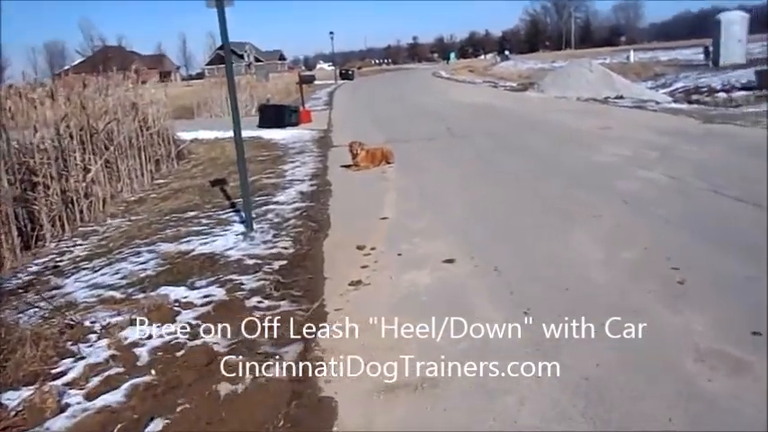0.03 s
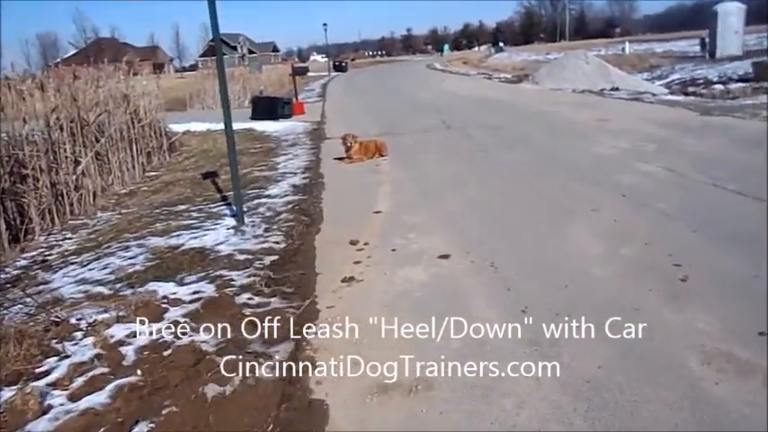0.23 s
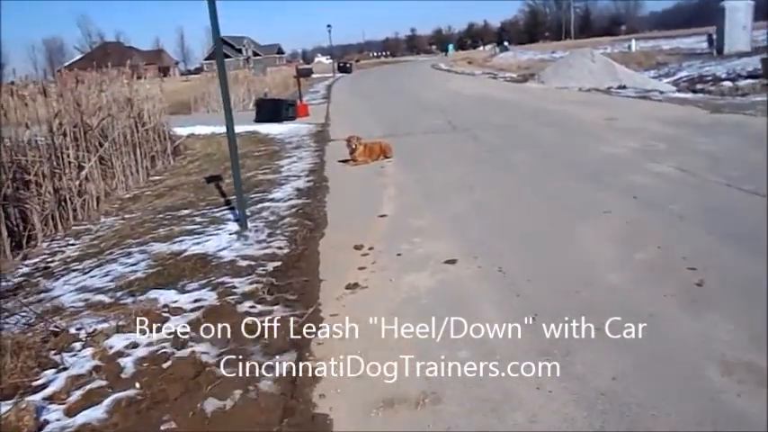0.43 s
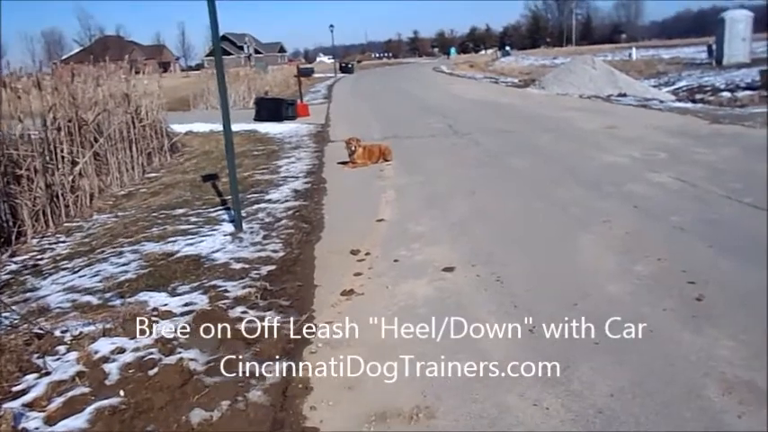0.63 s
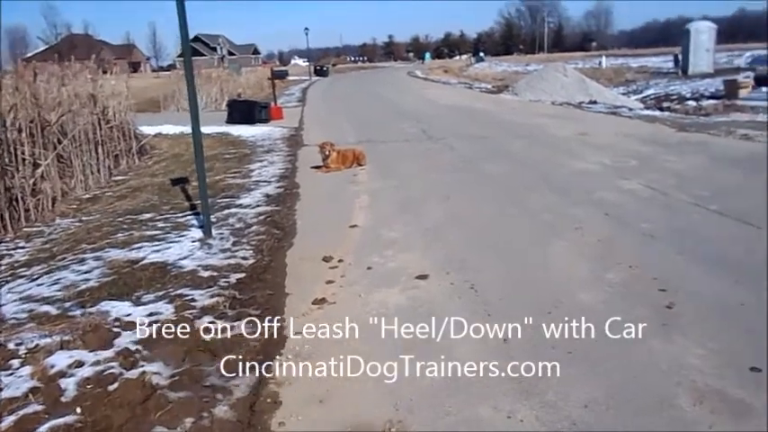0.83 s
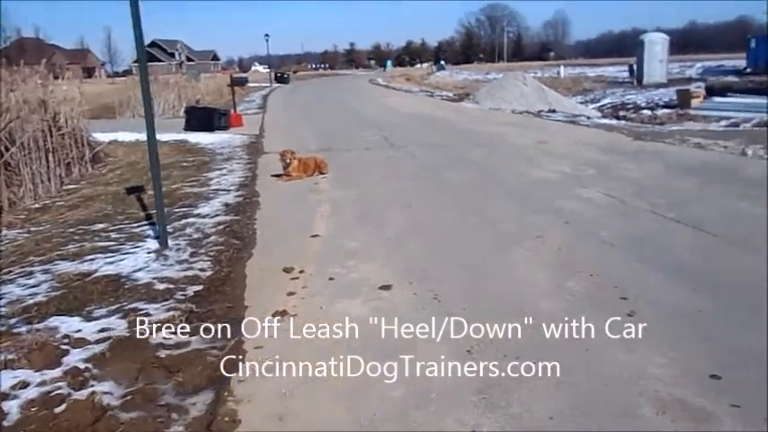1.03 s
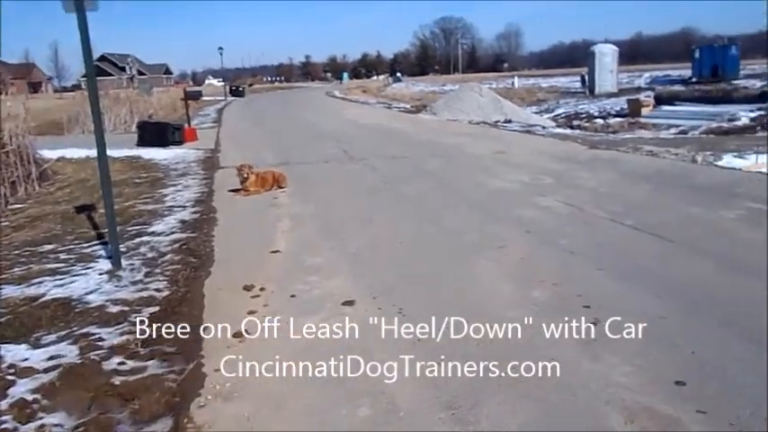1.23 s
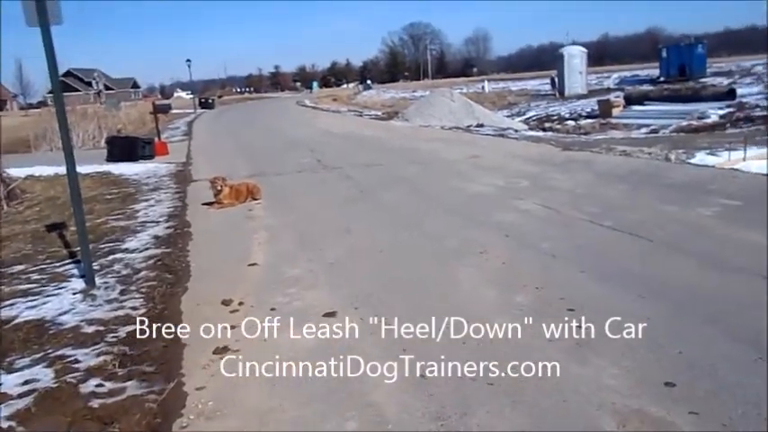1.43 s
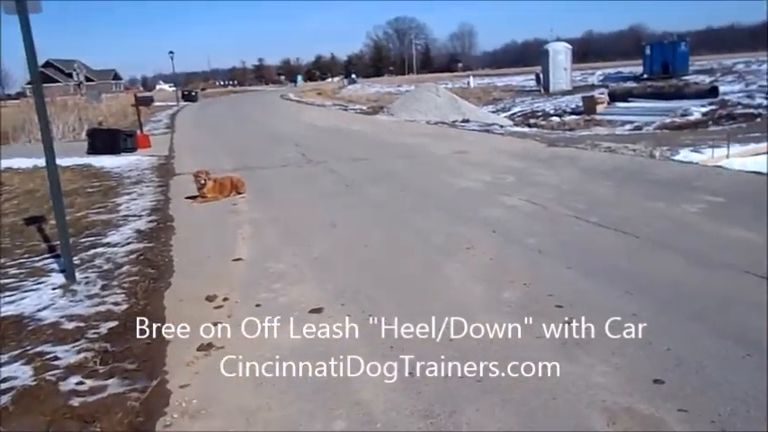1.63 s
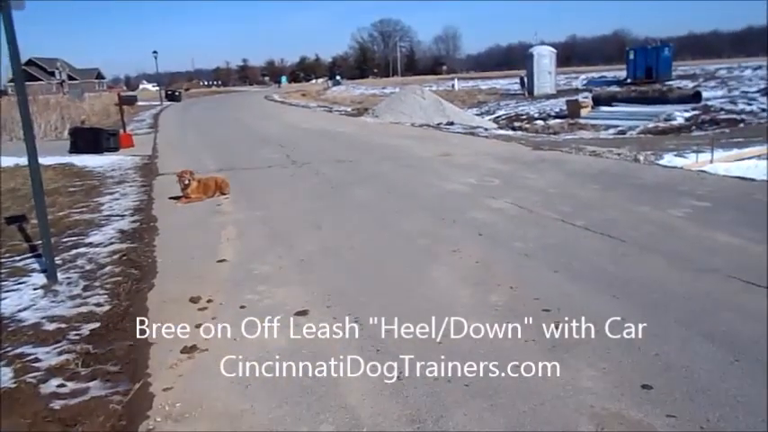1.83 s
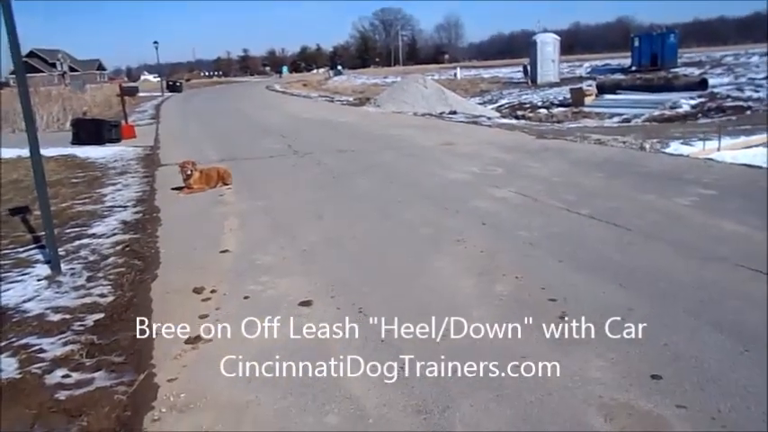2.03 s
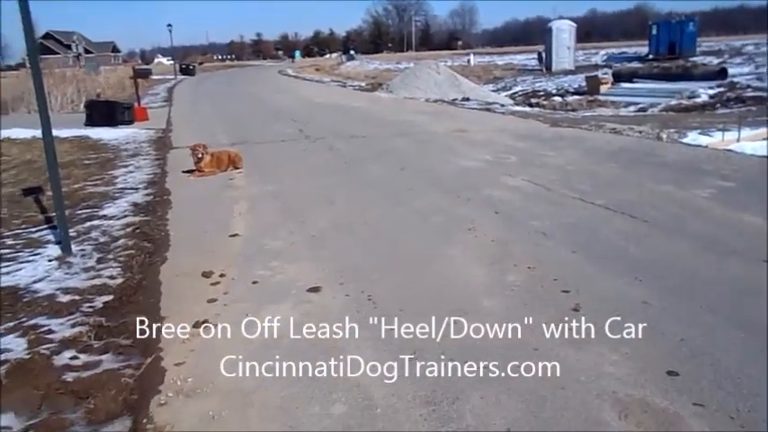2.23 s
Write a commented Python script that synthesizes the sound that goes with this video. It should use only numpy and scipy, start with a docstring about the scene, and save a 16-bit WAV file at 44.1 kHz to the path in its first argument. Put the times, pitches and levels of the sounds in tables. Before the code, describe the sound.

Slow footsteps crunch on gritty asphalt over a low distant engine hum and outdoor air.

```python
"""Slow footsteps on gritty asphalt beside an open country road.
All through, two distant engines idle with a low beating hum, amid thin whines and a wash of outdoor air.
First soles knock softly, loose stones snap in damped rings, and fine grit crunches as many tiny cracks.
A far bird then whistles once, a gliding tone that arches upward.
Quieter steps follow, with more knocks and snaps, dull scuffs of filtered noise, and fine crunching."""
import sys
import numpy as np
from scipy import signal
from scipy.fft import rfft, irfft
from scipy.io import wavfile
from scipy.ndimage import uniform_filter1d

SR = 44100
rng = np.random.default_rng(int(sys.argv[2]) if len(sys.argv) > 2 else 0)


def put_to_file(sound):
    """Save the sound as 16-bit audio at rate SR, in the file named by the first command-line argument."""
    columns = np.atleast_2d(sound).T  # one column per channel
    safe = np.clip(columns, -1, 1)
    whole_steps = np.round(safe * 32767)
    wavfile.write(sys.argv[1], SR, whole_steps.astype(np.int16))


N = 99225  # samples: 2.25 s


def amp(db):
    """Turns decibels into a gain."""
    return 10 ** (np.asarray(db) / 20)


def evened(x):
    """Scales a sound to an average (rms) level of 1."""
    return x / np.sqrt(np.mean(x ** 2) + 1e-20)


def read(points, hz):
    """Reads between the points of a (pitch_hz, value) table, on a log pitch axis."""
    point_hz, value = np.transpose(points)
    return np.interp(np.log(hz + 1), np.log(point_hz + 1), value)


def add(mix, start_s, sound):
    """Mixes a sound in from its start time, cutting it at the end of the mix."""
    first = max(round(start_s * SR), 0)
    part = mix[first:][:len(sound)]
    part += sound[:len(part)]


def coloured(x, points, size=2048):
    """Filters with a (pitch_hz, level_db) response that never sounds ahead of its input."""
    hz = abs(np.fft.fftfreq(size, 1 / SR))
    log_gain = np.log(amp(read(points, hz)))
    # the Hilbert transform finds the phase that keeps the filter causal
    taps = np.fft.ifft(np.exp(np.conj(signal.hilbert(log_gain)))).real
    return signal.fftconvolve(x, taps[:size // 2])[:N]


def drift(rate_hz):
    """Smooth random wandering of rms 1, mostly slower than the given rate."""
    hz = np.fft.rfftfreq(2 * N, 1 / SR)
    spectrum = rfft(rng.standard_normal(2 * N))
    return evened(irfft(spectrum * np.exp(-(hz / rate_hz) ** 2))[:N])


def ping(hz, cycles, size=512):
    """A heavily damped ring whose envelope swells to 1, then dies within a few cycles."""
    turns = hz * np.arange(size) / SR
    u = turns / cycles
    envelope = (u / 2) ** 2 * np.exp(2 - u)
    return envelope * np.sin(2 * np.pi * (turns - 2 * cycles) - np.pi / 2)


def pressure(peak_s, rise_s, fall_s):
    """Weight builds up to a peak time and is then released."""
    t = np.arange(N) / SR - peak_s
    roundness = 1.06  # 1 gives a sharp peak, 2 a bell
    return np.exp(-np.maximum(-t / rise_s, t / fall_s) ** roundness)


def hits(rows):
    """One short ring for each hard little contact."""
    out = np.zeros(N)
    for start_s, level_db, pitch_hz, decay_cycles in rows:
        add(out, start_s, amp(level_db) * ping(pitch_hz, decay_cycles))
    return out


# Stones snapping under a sole; decay is counted in cycles of the pitch, levels are relative.
# Columns: start_s, level_db, pitch_hz, decay_cycles
STONE_SNAPS = [(.2760, -28.5, 3270, 1), (.2798, -30, 4200, 0.28), (.3325, -29.5, 3340, 0.68),
               (.3332, -30.5, 5450, .3), (.3432, -42, 4400, 0.27), (.3830, -25.5, 4170, 0.67),
               (.3894, -4, 3040, 0.38), (.3949, -20, 3600, 0.54), (.3996, -17.5, 4020, 0.64),
               (.4061, -56, 2950, 0.35), (.4121, -19.5, 3900, 0.35), (.4253, -37, 4400, 0.33),
               (.4337, -23, 3250, 0.2), (.4467, -30, 4200, .4), (.4497, -27, 4200, 0.32),
               (.4620, -36, 3420, 0.3), (.5501, -28.5, 4050, 0.32), (1.0458, -36.5, 4580, 0.33),
               (1.1915, -35, 3700, 0.24), (1.2416, -36.5, 4300, 0.19), (1.2875, -38, 3560, 0.82),
               (1.3975, -41.5, 4770, 0.37), (1.4864, -38.5, 4470, 0.49), (1.5645, -24, 3700, 0.29),
               (1.6677, -21.5, 5000, 0.37), (1.6738, -37, 4800, 0.29), (1.6822, -21, 3830, .3),
               (1.6994, -36, 5000, 0.53), (1.7201, -36, 4600, .3), (1.8531, -32, 4800, 0.25),
               (1.8874, -31, 3580, 0.17), (1.9018, -29, 2960, 0.24), (1.9092, -21.5, 4300, .28),
               (1.9725, -33, 4940, 0.39), (1.9800, -28, 4700, 0.25)]
SNAP_BOOST_DB = 2


def stones():
    """Loose stones snap: each is a ring that dies almost at once."""
    return amp(SNAP_BOOST_DB) * hits(STONE_SNAPS)


# Heel and sole knocks, with relative levels.
# Columns: start_s, level_db, pitch_hz
SOLE_KNOCKS = [(0.2879, -37, 1390), (.2948, -29.5, 820), (0.3927, -27, 1090), (0.4123, -25, 1020),
               (.4500, -28, 1520), (1.1912, -30.5, 930), (1.2861, -33.5, 940), (1.2902, -30, 910),
               (1.6506, -33, 1600), (1.6818, -32.5, 1510), (1.8528, -35.5, 1060), (1.8874, -29.5, 1420),
               (1.9329, -34.5, 1320)]
KNOCK_DECAY_CYCLES, KNOCK_BOOST_DB = 0.33, 1.5


def knocks():
    """Heels and soles knock: lower rings, all damped equally fast for their pitch."""
    rows = [(*row, KNOCK_DECAY_CYCLES) for row in SOLE_KNOCKS]
    return amp(KNOCK_BOOST_DB) * hits(rows)


# A sole rolling over fine grit; the level is that of the grain noise at most pressure.
# Columns: peak_s, rise_s, fall_s, level_db, grain_pitch_hz, grains_per_s
GRIT_ROLLS = [(.278, 0.0084, 0.0089, -38, 3670, 2000), (.388, 0.025, 0.023, -34.5, 3820, 3800),
              (0.439, 0.041, 0.037, -48, 3780, 1200), (.55, 0.029, .015, -53.5, 4230, 1500),
              (1.64, 0.054, .025, -53, 4550, 1750), (1.695, 0.037, 0.026, -47.5, 4630, 1200),
              (1.94, 0.026, 0.024, -52.5, 4360, 2000), (1.974, 0.018, 0.0084, -46.5, 5240, 4300),
              (2.018, 0.014, 0.015, -49, 5000, 4400)]
GRAIN_SPREAD_DB, GRAIN_DECAY_CYCLES = 4, 0.59


def grit(sizes=6):
    """Many tiny grains of mixed size crack while the sole presses on them."""
    out = np.zeros(N)
    for peak_s, rise_s, fall_s, level_db, pitch_hz, grains_per_s in GRIT_ROLLS:
        grains = np.zeros(N)
        for ratio in np.geomspace(.65, 1.3, sizes):  # pitch of each grain size
            loudness_db = GRAIN_SPREAD_DB * np.minimum(rng.exponential(1, N), 4)
            strength = amp(loudness_db) * rng.choice([-1, 1], N)
            cracks = strength * (rng.random(N) < grains_per_s / sizes / SR)
            grains += signal.oaconvolve(cracks, ping(pitch_hz * ratio, GRAIN_DECAY_CYCLES))[:N]
        out += amp(level_db) * pressure(peak_s, rise_s, fall_s) * evened(grains)
    return out


# The sole's dull scuff as weight comes on it; the level is that of the noise at its peak.
# Columns: peak_s, level_db
SOLE_SCUFFS = [(.250, -52.5), (0.298, -43), (0.39, -36), (1.288, -53), (1.685, -44.5)]
# Tone of rubber rubbing on the road.
# Columns: pitch_hz, level_db
SCUFF_TONE = [(120, -30), (280, -3), (440, 4), (900, 1.5), (1600, 2), (2400, 1), (6000, -26.5)]
SCUFF_RISE_S, SCUFF_FALL_S = 0.017, 0.017


def scuffs():
    """Rubber rubs dully on the road as each foot settles: noise shaped by the weight."""
    weight = np.zeros(N)
    for peak_s, level_db in SOLE_SCUFFS:
        weight += amp(level_db) * pressure(peak_s, SCUFF_RISE_S, SCUFF_FALL_S)
    return weight * evened(coloured(rng.standard_normal(N), SCUFF_TONE))


# Colour of everything that sounds underfoot.
# Columns: pitch_hz, level_db
GROUND_TONE = [(100, -21), (400, 2), (900, 2), (1600, 4), (2150, -3), (2700, -3), (3300, 0.5), (3900, -2),
               (5200, 3.5), (6200, 4), (10000, 13.5)]
SCATTER_DB, SCATTER_T60_S = -17.5, 0.029  # T60: time to fall by 60 dB


def footsteps(size=4096):
    """Snaps, knocks, grit and scuffs, briefly thrown back by legs and road."""
    direct = stones() + knocks() + grit() + scuffs()
    t = np.arange(size) / SR
    tail = rng.standard_normal(size) * np.exp(-np.log(1000) * t / SCATTER_T60_S)
    scatter = signal.fftconvolve(direct, tail / np.linalg.norm(tail))[:N]
    return coloured(direct + amp(SCATTER_DB) * scatter, GROUND_TONE)


# Idling engines; levels are the middle rms levels of the first harmonics, which then throb.
# Columns: firing_rate_hz, list of level_db
IDLING_ENGINES = [(55.7, [-66, -58, -57.5, -64.5, -76.5, -64.5, -68.5, -71]),
                  (58.0, [-64.5, -54.5, -49.5, -61, -64, -70.5, -59.5, -63])]
WAVER_FRACTION, WAVER_HZ, THROB_DB = 0.02104, 7.54, 1.5  # rms speed change, its rate, rms level change


def engines():
    """Two slightly different idling speeds beat against each other and waver."""
    out = np.zeros(N)
    for firing_hz, levels_db in IDLING_ENGINES:
        speed_hz = firing_hz * (1 + WAVER_FRACTION * drift(WAVER_HZ))
        turns = np.cumsum(speed_hz) / SR
        for harmonic, level_db in enumerate(levels_db, 1):
            level = np.sqrt(2) * amp(level_db + THROB_DB * drift(WAVER_HZ))  # rms to peak
            out += level * np.sin(2 * np.pi * (harmonic * turns + rng.random()))
    return out


# A far bird's whistle
BIRD_START_S, BIRD_LENGTH_S, BIRD_TOP_S = .818, .19, .135  # top is timed from the start
BIRD_FROM_HZ, BIRD_TOP_HZ = 3620, 3970
BIRD_DB, BIRD_FADE_DB, BIRD_RAMP_S = -58, -11, .03  # starting level, its change by the end, end ramps


def bird():
    """One thin whistle whose pitch arches upward while it fades."""
    t = np.arange(0, BIRD_LENGTH_S, 1 / SR)
    out = np.zeros(N)
    hz = BIRD_TOP_HZ - (BIRD_TOP_HZ - BIRD_FROM_HZ) * (1 - t / BIRD_TOP_S) ** 2
    ramps = np.clip(np.minimum(t, BIRD_LENGTH_S - t) / BIRD_RAMP_S, 0, 1)
    level = ramps * amp(BIRD_DB + BIRD_FADE_DB * t / BIRD_LENGTH_S)
    add(out, BIRD_START_S, level * np.sin(2 * np.pi * np.cumsum(hz) / SR))
    return out


# Thin unsteady whines of the far machinery, with rms levels.
# Columns: pitch_hz, half_width_hz, level_db
MACHINE_WHINES = [(394, 4.7, -61), (1155, 22, -60), (2965, 46, -69)]


def whines():
    """Narrow tones that fade in and out on their way across the field."""
    t = np.arange(N) / SR
    out = np.zeros(N)
    for pitch_hz, half_width_hz, level_db in MACHINE_WHINES:
        # a two-part drift makes both the loudness and the phase wander
        wander = drift(half_width_hz) + 1j * drift(half_width_hz)
        out += amp(level_db) * (wander * np.exp(2j * np.pi * pitch_hz * t)).real
    return out


# Tone of outdoor air and far traffic, as relative level per Hz.
# Columns: pitch_hz, level_db
AIR_TONE = [(20, -23), (38, -20), (55, 2), (90, -1.5), (200, 3.5), (300, 0), (420, -7.5), (550, -6),
            (850, -9.5), (1160, -5), (1450, -8.5), (1750, -14), (2300, -17.5), (3000, -14), (3800, -23),
            (5500, -24.5), (10000, -31.5)]
AIR_DB, AIR_PATCH_DB = -44, 1  # overall rms level, rms strength of the patches


def air():
    """A steady wash of distant noise with faint drifting patches."""
    hz, _, noise = signal.stft(rng.standard_normal(N), SR, nperseg=2048, noverlap=1536)
    patches = uniform_filter1d(rng.standard_normal(noise.shape), size=14, axis=0)  # across pitch
    patches = evened(uniform_filter1d(patches, size=8, axis=1))  # across time
    noise = noise * amp(read(AIR_TONE, hz)[:, None] + AIR_PATCH_DB * patches)
    wash = signal.istft(noise, nperseg=2048, noverlap=1536)[1][:N]
    return amp(AIR_DB) * evened(wash)


def scene():
    """Near footsteps over the distant background."""
    return (footsteps() + engines() + bird() + whines() + air())[None]


# The recorder's treble filter: a dull roll-off with three narrow dips.
# Columns: pitch_hz, level_db
TREBLE_TONE = [(5600, -1), (6200, -4.5), (6700, -16), (7000, -29), (7400, -15), (8100, -16), (8500, -32),
               (8900, -14), (9600, -13), (10000, -32), (10400, -11.5), (11000, -20)]
TOP_EDGE_HZ = 11200


def record(dry):
    """The recorder's dull treble, then a steep cut of the highest treble."""
    heard = coloured(dry[0], TREBLE_TONE)
    low_pass = signal.firwin(255, TOP_EDGE_HZ, window=("kaiser", 8), fs=SR)
    return signal.oaconvolve(heard, low_pass, "same")[None]


dry = scene()
out = record(dry)
put_to_file(out)
```